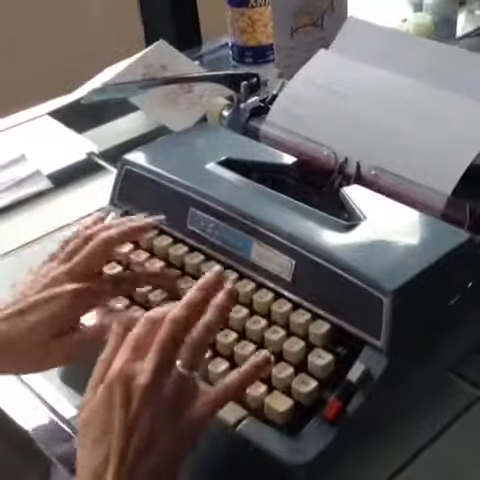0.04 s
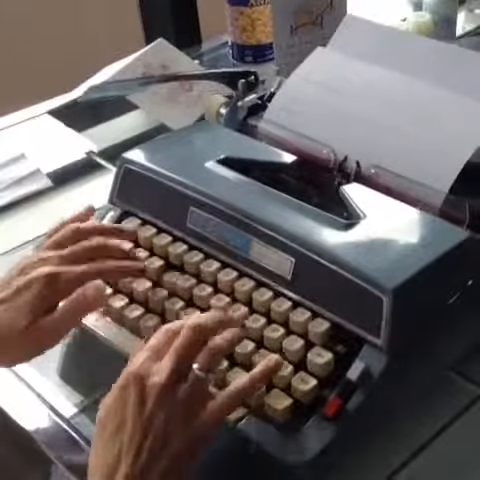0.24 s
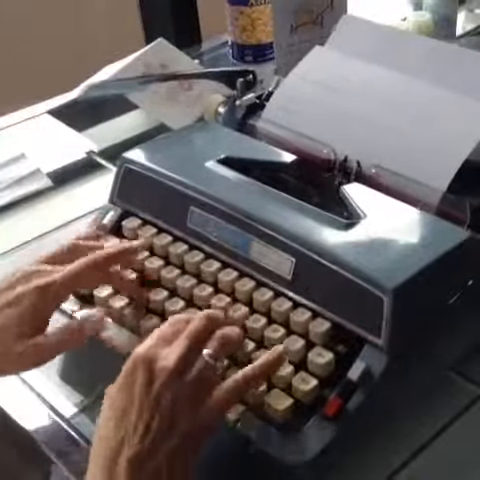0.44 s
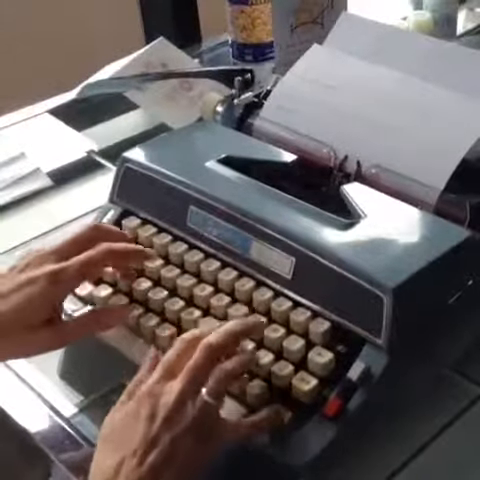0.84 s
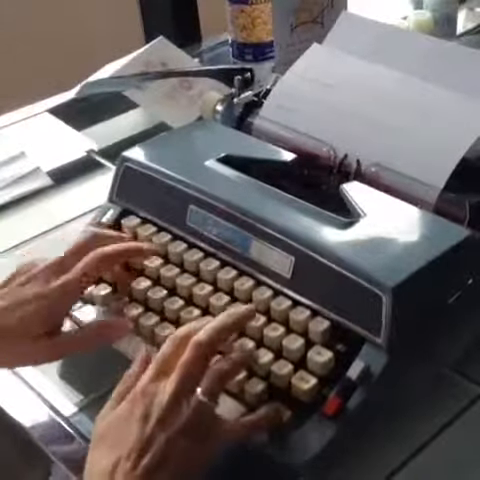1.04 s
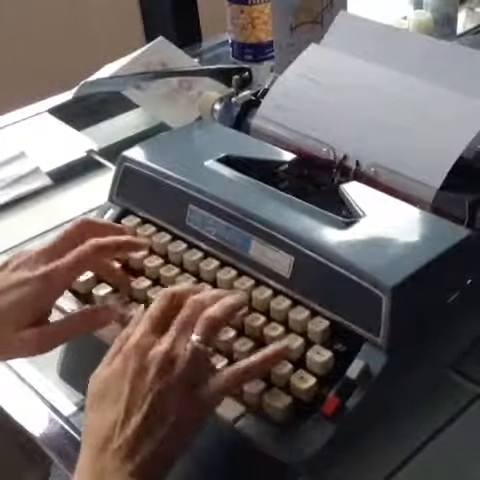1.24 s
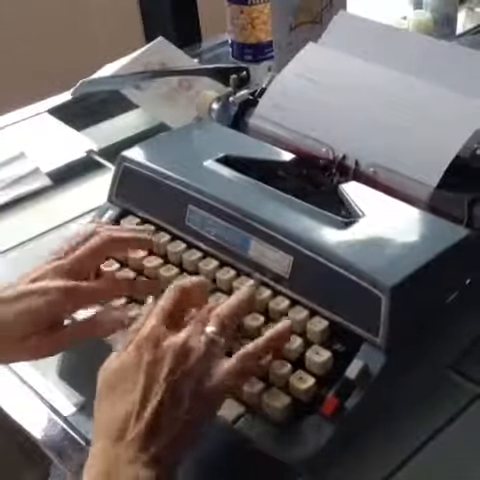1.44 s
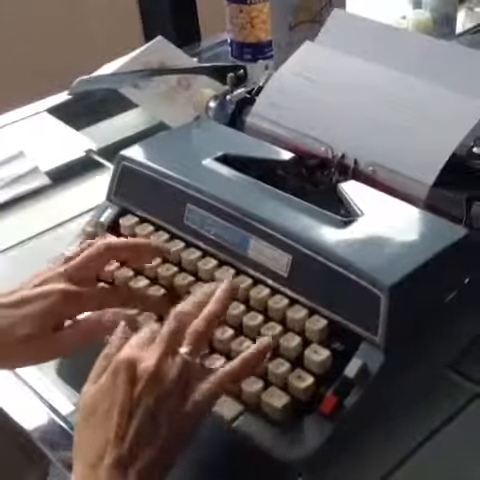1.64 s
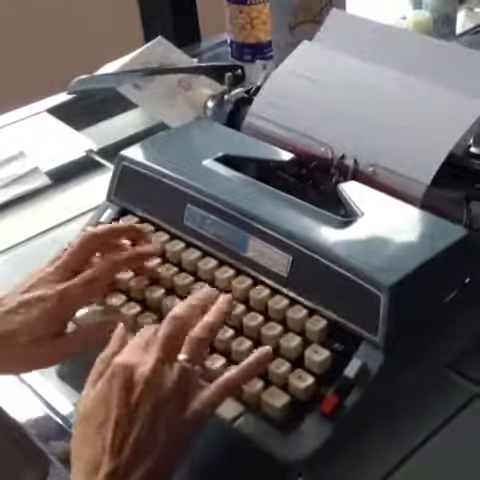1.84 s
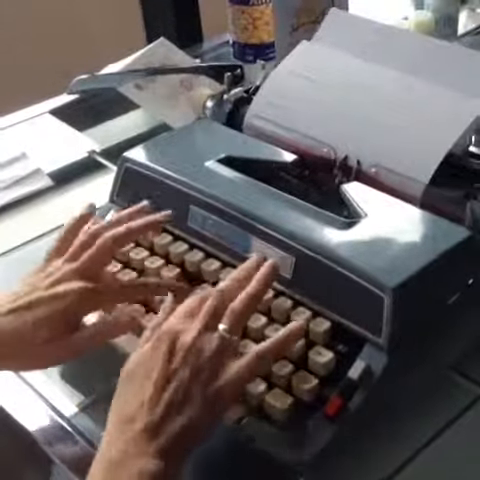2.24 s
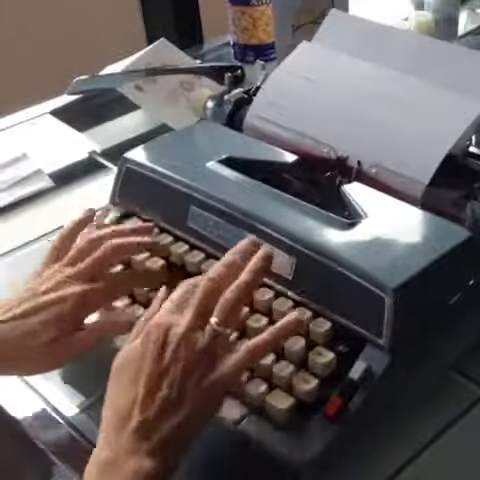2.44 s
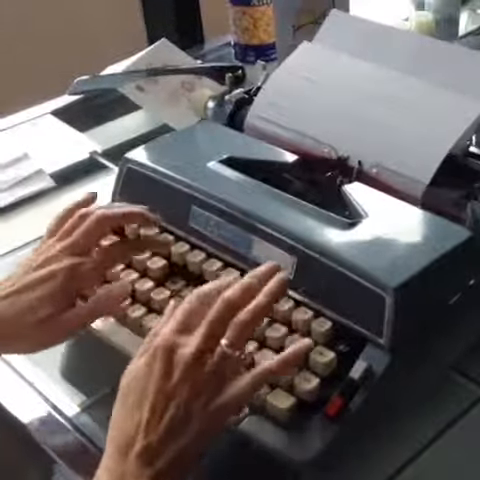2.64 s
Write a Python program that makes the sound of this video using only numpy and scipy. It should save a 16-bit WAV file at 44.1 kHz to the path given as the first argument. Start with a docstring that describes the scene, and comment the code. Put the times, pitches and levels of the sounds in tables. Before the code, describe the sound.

Someone types on a portable manual typewriter, close to the microphone in a quiet room. Two sharp metallic clacks lead to a low shift thump, then a longer irregular run of keystrokes ends in light carriage clicks.

```python
"""A portable manual typewriter on a desk in a small quiet room, heard from close by over a faint hiss.
A finger moves a key lever, the escapement ticks, the slug hits the platen and the linkage rattles on;
each blow excites the damped modes of frame and case. After two letters the carriage clicks. The shift
drops with a dull bouncing thump, one capital is struck, and the shift is let go. Five more letters
follow, then a tiny high ping and two light carriage clicks among the last lever movements."""
import sys
import numpy as np
from scipy import signal
from scipy.fft import rfft, irfft, next_fast_len
from scipy.io import wavfile

SR = 44100
rng = np.random.default_rng(int(sys.argv[2]) if len(sys.argv) > 2 else 0)


def to_wav(sig):
    """Store sig (one row per channel, or 1-D mono) as 16-bit WAV at the path in sys.argv[1].

    Samples outside -1..1 are clipped; the rate is SR.
    """
    pcm = np.clip(np.atleast_2d(sig), -1, 1) * 32767
    pcm = np.round(pcm).astype(np.int16)
    wavfile.write(sys.argv[1], SR, pcm.T)  # frames by channels


N = 123479
AGE = np.arange(int(0.6 * SR)) / SR  # time since an excitation [s]

# key levers starting or falling back (time [s], level [dB], tilt [dB/octave], case thump [dB])
LEVER_MOVES = [(0.069, -50, 1, -53), (0.176, -56, -9, -48.5), (.314, -50, 1, -50), (0.322, -51.5, 1.5, -57),
               (.497, -60.5, 1, -59), (0.647, -57.5, 0.5, -52.5), (1.338, -52, 2.5, -65),
               (1.352, -54, -3, -51), (1.545, -49, 1.5, -50), (1.582, -69, 12, -42.5), (1.686, -52, 2, -46),
               (1.898, -52, 1.5, -47.5), (2.005, -51.5, 0, -51.5), (2.045, -62, -0.5, -52),
               (2.143, -50, 1, -55), (2.272, -46, -3, -48), (2.358, -61, -2.5, -54),
               (2.525, -59, -1, -53.5)]
# slugs on the platen (time [s], level [dB], tilt [dB/octave], escapement lead [s], escapement [dB],
# frame knock [dB], rattle [dB], case thump [dB])
SLUG_STRIKES = [(0.1255, -30, -1.5, 0.0068, -46, -39, -46, -46),
                (0.3764, -29.5, -1.5, 0.0078, -42.5, -41, -45.5, -44),
                (1.1070, -29, 1.1, .005, -46, -45, -46, -48),
                (1.3870, -32.5, 0, 0.009, -43.5, -43.5, -48, -46),
                (1.565, -28, -0.5, 0.0058, -46.5, -38.5, -46.5, -49.5),
                (1.7262, -30, -1.7, 0.0048, -45, -39.5, -45, -45.5),
                (1.935, -35.5, -2, .007, -46, -47.5, -52, -50),
                (2.1951, -32, -2.2, 0.0081, -46.5, -44, -46.5, -46)]
# carriage steps (time [s], level [dB], tilt [dB/octave], rail ring [dB], case thump [dB])
CARRIAGE_STEPS = [(.5640, -42.5, -1.8, -44, -45.5), (2.3058, -46, 0.2, -53.5, -47),
                  (2.4802, -45, 0.8, -56, -43.5)]
# the shift hitting its stops and bouncing (time [s], thump [dB], clatter [dB])
SHIFT_IMPACTS = [(0.825, -26.5, -42), (0.861, -33, -54.5), (0.888, -35, -59), (0.902, -40.5, -68),
                 (1.2197, -35.5, -45.5), (1.235, -41, -44), (1.261, -37.5, -58)]

# normal modes (frequency [Hz], relative level [dB], t60 [s])
CASE_MODES = [(120.1, -6, .28), (150.4, -3.5, 0.31), (182, -4.5, 0.19), (212, 0.5, 0.35),
              (256.3, -5.5, 0.37), (308, -8, 0.21), (336.5, -9, 0.25), (426, -7, 0.11),
              (463.4, -14.5, 0.14)]  # the case on the desk
STEEL_MODES = [(1488, -10, 0.015), (1747, -5.5, 0.044), (1933, -1.5, 0.043), (2203, -13.5, 0.11),
               (2654, -3, 0.018), (2803, -9, 0.034), (3110, -10.5, 0.05), (3490, 2, 0.012),
               (3488, 3, 0.018), (3800, 4.5, 0.012), (4310, -7.5, .028), (5420, -9, 0.05),
               (6850, -18, 0.08), (8000, -24, 0.09)]  # type bar, platen and cover
FRAME_MODES = [(477, -5, 0.19), (658, 2, 0.051), (821.4, -0.5, 0.092), (905, 1, 0.047), (1176, -13, 0.2)]
RAIL_MODES = [(490, -7, 0.16), (630, -5, .2), (775, -6, 0.17), (835, -7, 0.16), (916, 1.5, 0.12),
              (1010, -8, 0.22), (1283, -7, 0.14), (2270, -6, 0.16), (5580, -13, 0.13)]

# noise spectra (frequency [Hz], relative spectral density [dB])
LEVER_SPECTRUM = [(200, 8.5), (700, 2.5), (1200, -3), (1900, -3), (2700, -15), (3600, -10), (5500, -25.5),
                  (15000, -23.5)]
THUD_SPECTRUM = [(60, -45), (115, 8.5), (220, 3), (330, -8), (600, -18), (1500, -62)]  # the case's dull first response
TICK_SPECTRUM = [(300, -16), (1200, -0.5), (1900, -6), (2700, -18), (3700, -7), (6000, -23), (10000, -21),
                 (15000, -43)]  # escapement
CRACK_SPECTRUM = [(590, -46), (1000, -24), (1310, -12.5), (2000, 0), (3110, -10.5), (3680, -6.5),
                  (4720, -15), (6130, -20), (7690, -15.5), (9860, -35), (15000, -29)]  # slug on platen
BASKET_SPECTRUM = [(400, -14), (1100, -11), (1900, 4), (2800, 0), (3700, -3), (4800, -8), (5600, 1),
                   (7500, -5), (10000, -13.5), (15000, -22)]  # idle type bars
RATTLE_SPECTRUM = [(200, -0.5), (450, 3.5), (850, 4.5), (1200, 2.5), (2000, 5), (2700, 0.5), (3800, 3),
                   (4800, -1), (5800, -1.5), (9000, -15), (15000, -20)]  # linkage
KNOCK_SPECTRUM = [(200, -35), (450, 9), (800, -8), (1300, -11.5), (2500, -36)]  # frame
SNAP_SPECTRUM = [(1000, -3), (2000, 9), (3200, 1), (5600, -5), (8000, -13.5), (11500, -4), (15000, -25)]  # the pawl's first contact
CLICK_SPECTRUM = [(300, -4), (900, 1.5), (1400, 2.5), (2100, 4), (3000, -3.5), (5500, -1), (8000, -9.5),
                  (11500, -8), (15000, -12)]  # carriage
CLATTER_SPECTRUM = [(150, -9), (450, 4.5), (800, -5.5), (1300, -10), (2200, -15.5), (3000, -25.5),
                    (4000, -21), (7000, -33), (15000, -32)]  # shift
HISS_SPECTRUM = [(25, 6), (70, -14.5), (125, 6.5), (220, 5.5), (400, -5), (1000, -11.5), (3000, -16.5),
                 (8000, -17), (15000, -19.5)]  # steady background

# reflections from desk, paper and wall (delay [s], level [dB])
NEAR_ECHOES = [(.0017, -3.5), (.0031, -0.5), (.0078, -3.5)]
# reverberation time of the room (frequency [Hz], t60 [s])
ROOM_T60 = [(100, 0.78), (250, 0.51), (800, 0.58), (3000, 0.36), (6000, 0.28), (14000, 0.45)]


def amp(db):
    """Amplitude ratio of a level in decibels."""
    return 10 ** (np.asarray(db) / 20)


def unit(x):
    """Normalisation to rms 1."""
    return x / np.sqrt(np.mean(x ** 2) + 1e-20)


def along(points, hz):
    """Interpolation of (frequency [Hz], value) points on a logarithmic frequency axis."""
    freqs, values = np.transpose(points)
    return np.interp(np.log(hz + 1), np.log(freqs + 1), values)


def noise(spectrum, size, tilt=0):
    """Random phases under a given spectrum, tilted in dB per octave, sum to noise of rms 1."""
    hz = np.fft.rfftfreq(size, 1 / SR)
    phase = np.exp(2j * np.pi * rng.random(len(hz)))
    return unit(irfft(phase * amp(along(spectrum, hz) + tilt * np.log2(hz + 20)), size))


def fade(attack, t60):
    """Damping: after a rise of time constant attack [s], amplitude falls 60 dB every t60 [s]."""
    return (1 - np.exp(-AGE / attack)) * np.exp(-np.log(1000) * AGE / t60)


def burst(spectrum, attack, t60, tilt=0):
    """Incoherent superposition: many small parts sounding at once give decaying noise."""
    envelope = fade(attack, t60)
    sound = noise(spectrum, len(AGE), tilt) * envelope
    return sound * np.linalg.norm(envelope) / np.linalg.norm(sound)


def ring(modes, attack, scatter_db, tilt=0):
    """Free vibration is a sum of damped modes, excited a little differently by each blow."""
    hz, db, t60 = np.transpose(modes)
    level_draw, pitch_draw = rng.standard_normal((2, len(hz)))
    gains = amp(db + scatter_db * level_draw + tilt * np.log2(hz))
    gains *= np.sqrt(2) / np.linalg.norm(gains)
    phases = 2 * np.pi * rng.random(len(hz))
    detuned_hz = hz * (1 + 0.006 * pitch_draw)
    return sum(gain * np.sin(2 * np.pi * freq * AGE + phase) * fade(attack, decay)
               for gain, freq, phase, decay in zip(gains, detuned_hz, phases, t60))


def chatter(rate_hz=350, depth_db=1.5):
    """Amplitude modulation by loose parts touching at uneven moments."""
    knots = rng.standard_normal(1000)
    return unit(amp(depth_db * np.interp(AGE * rate_hz, np.arange(len(knots)), knots)))


def key_levers():
    """Contact noise: each moving lever chatters softly while its weight pushes on the case."""
    out = np.zeros(N)
    for at, db, tilt, case_db in LEVER_MOVES:
        add(out, at, amp(db) * chatter() * burst(LEVER_SPECTRUM, attack=0.00061, t60=0.22, tilt=tilt))
        add(out, at, amp(case_db) * case_thump(push_hz=232, push_t60=0.072, thud_db=-8, boom_db=-3))
    return out


def add(track, at, sound):
    """Linear superposition: a sound joins the track at a time in seconds."""
    part = track[max(0, round(at * SR)):][:len(sound)]
    part += sound[:len(part)]


def case_thump(push_hz, push_t60, thud_db, boom_db):
    """Transient response: after one damped push the case thuds and its modes boom on the desk."""
    push = np.sqrt(2) * np.sin(2 * np.pi * push_hz * AGE) * fade(0.0015, push_t60)
    thud = burst(THUD_SPECTRUM, attack=0.00063, t60=0.074)
    boom = ring(CASE_MODES, attack=0.0063, scatter_db=5.5)
    return push + amp(thud_db) * thud + amp(boom_db) * boom


def type_bars(frame_lag_s=0.00365, case_lag_s=0.00461):
    """Impact transmission: the escapement ticks, then the blow shakes basket, linkage, frame and case."""
    out = np.zeros(N)
    for at, db, tilt, lead_s, tick_db, frame_db, rattle_db, case_db in SLUG_STRIKES:
        add(out, at - lead_s, amp(tick_db) * burst(TICK_SPECTRUM, attack=0.002, t60=0.086))
        add(out, at, amp(db) * slug_impact(tilt))
        shiver = chatter() * burst(BASKET_SPECTRUM, attack=0.0028, t60=0.1, tilt=1.6 * tilt)
        add(out, at, amp(db - 14.5) * shiver)
        add(out, at + frame_lag_s, amp(frame_db) * frame_knock())
        rattle = chatter() * burst(RATTLE_SPECTRUM, attack=0.0077, t60=0.39, tilt=0.36 * tilt)
        add(out, at, amp(rattle_db) * rattle)
        thump = case_thump(push_hz=246, push_t60=0.05, thud_db=-8, boom_db=0.5)
        add(out, at + case_lag_s, amp(case_db) * thump)
    return out


def slug_impact(tilt, cutoff_hz=1220):
    """Impact rings the steel and gives a crack; so small a radiator emits little below the cutoff."""
    steel = ring(STEEL_MODES, attack=0.0002, scatter_db=1, tilt=tilt)
    contact = burst(CRACK_SPECTRUM, attack=0.0001, t60=0.01, tilt=tilt)
    radiation = signal.butter(2, cutoff_hz, "highpass", fs=SR, output="sos")
    crack = early_reflections(signal.sosfilt(radiation, contact))
    return amp(-0.5) * steel + amp(-3) * crack


def early_reflections(direct):
    """Reflection: nearby surfaces add delayed, weaker copies to the direct sound."""
    out = direct.copy()
    for delay, db in NEAR_ECHOES:
        add(out, delay, amp(db) * direct)
    return out


def frame_knock():
    """Impulse response of the frame: a dry knock and a short modal ring."""
    ringing = ring(FRAME_MODES, attack=0.0006, scatter_db=0.5)
    return ringing + amp(1.5) * burst(KNOCK_SPECTRUM, attack=0.00077, t60=0.012)


def carriage(rail_lag_s=0.01, case_lag_s=0.00461):
    """Successive impacts: the pawl snaps and lets go, then the carriage meets its stop and the rail rings."""
    out = np.zeros(N)
    for at, db, tilt, rail_db, case_db in CARRIAGE_STEPS:
        add(out, at, amp(db + 0.5) * burst(SNAP_SPECTRUM, attack=0.00012, t60=0.022, tilt=tilt))
        add(out, at, amp(db) * chatter() * burst(CLICK_SPECTRUM, attack=0.0015, t60=0.095, tilt=tilt))
        add(out, at + rail_lag_s, amp(rail_db) * ring(RAIL_MODES, attack=0.0065, scatter_db=3))
        thump = case_thump(push_hz=225, push_t60=0.05, thud_db=1.5, boom_db=-8)
        add(out, at + case_lag_s, amp(case_db) * thump)
    return out


def shift_key():
    """Inelastic collisions: the heavy shift assembly thuds and clatters as it bounces on its stops."""
    out = np.zeros(N)
    for at, db, clatter_db in SHIFT_IMPACTS:
        add(out, at, amp(db) * case_thump(push_hz=206, push_t60=0.031, thud_db=-5, boom_db=-16.5))
        add(out, at, amp(clatter_db) * chatter() * burst(CLATTER_SPECTRUM, attack=0.0017, t60=0.16))
    return out


def ping(at=2.271, hz=11870, db=-49):
    """A single damped sinusoid, heard as a tiny high ping."""
    out = np.zeros(N)
    add(out, at, amp(db) * np.sin(2 * np.pi * hz * AGE) * fade(attack=0.0016, t60=0.059))
    return out


def reverberation(direct, gap_s, build_s):
    """A diffuse field decays exponentially in each band, the treble sooner than the bass."""
    hz, t, bands = signal.stft(rng.standard_normal(len(AGE)), SR, nperseg=256)
    decay = np.exp(-np.log(1000) * t / along(ROOM_T60, hz)[:, None])
    tail = signal.istft(bands * decay, SR)[1][:len(AGE)]
    tail *= np.clip((AGE - gap_s) / build_s, 0, 1)
    return signal.fftconvolve(direct, tail / np.linalg.norm(tail))[:N]


def scene():
    """Superposition of machine, room and hiss; the small case radiates little deep bass."""
    vibration = type_bars() + key_levers() + carriage() + shift_key() + ping()
    direct = signal.sosfilt(signal.butter(4, 98, "highpass", fs=SR, output="sos"), vibration)
    room = amp(-11) * reverberation(direct, gap_s=0.0095, build_s=0.0092)
    hiss = amp(-60.5) * noise(HISS_SPECTRUM, N)
    return (direct + room + hiss)[None]


def record(dry, low_hz=90, top_hz=15250):
    """Band limiting: the recorder thins the deep bass and passes nothing above its upper limit."""
    thinned = signal.sosfilt(signal.butter(2, low_hz, "highpass", fs=SR, output="sos"), dry)
    size = next_fast_len(N + len(AGE))
    passband = np.fft.rfftfreq(size, 1 / SR) < top_hz
    return irfft(rfft(thinned, size) * passband, size)[:, :N]


dry = scene()
out = record(dry)
to_wav(out)
```